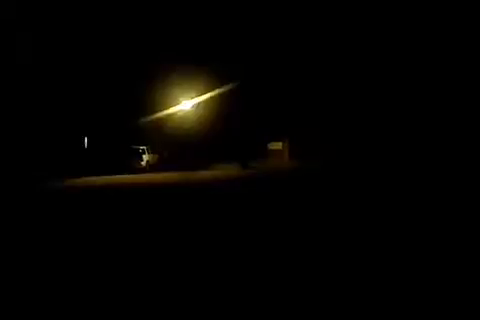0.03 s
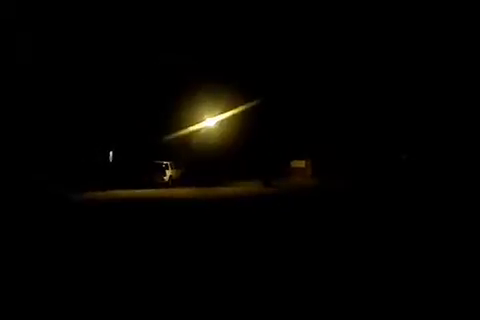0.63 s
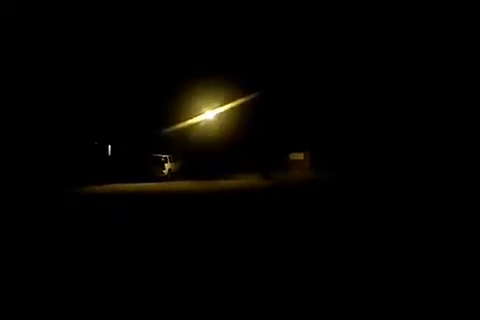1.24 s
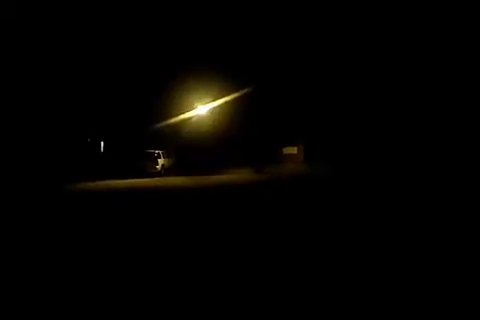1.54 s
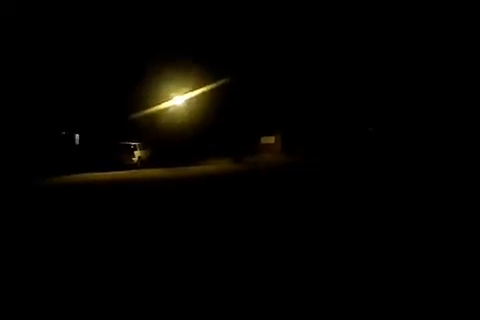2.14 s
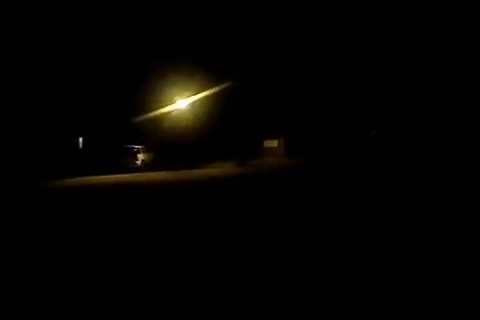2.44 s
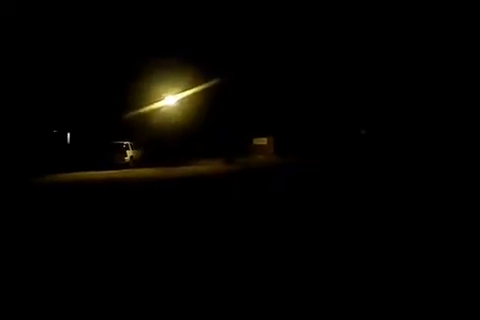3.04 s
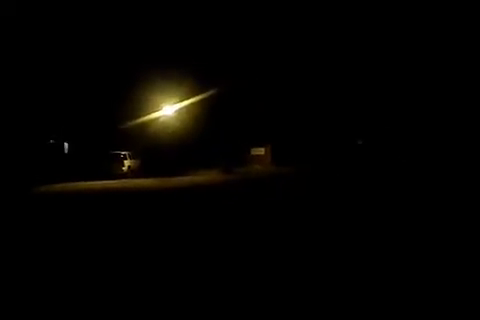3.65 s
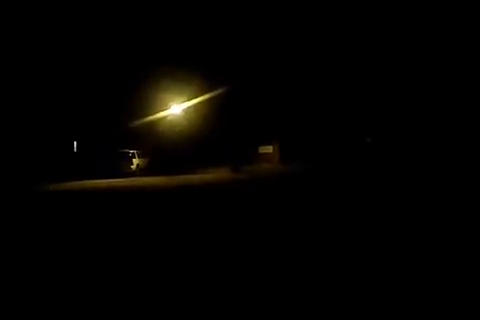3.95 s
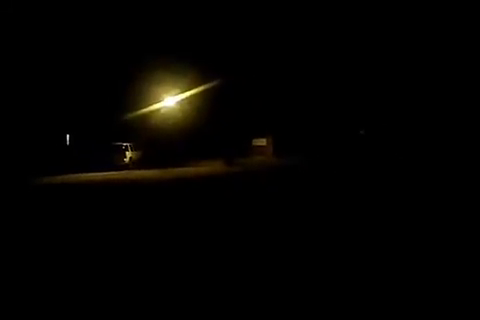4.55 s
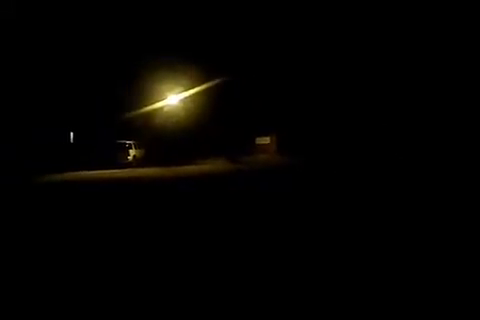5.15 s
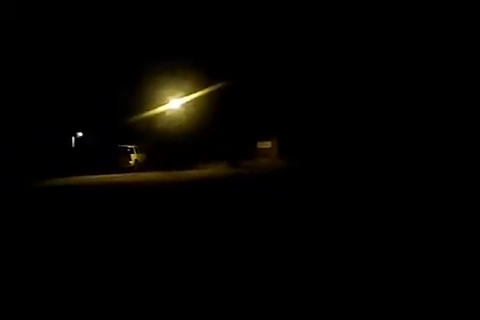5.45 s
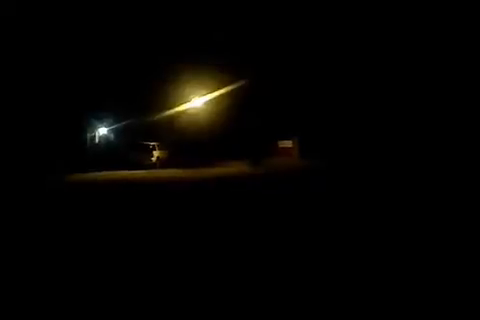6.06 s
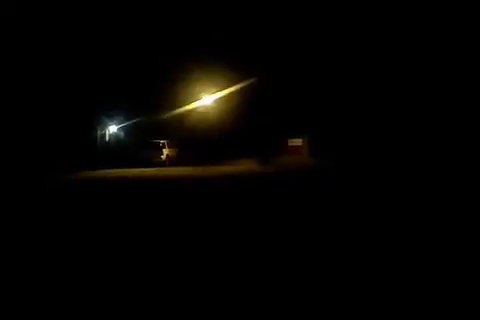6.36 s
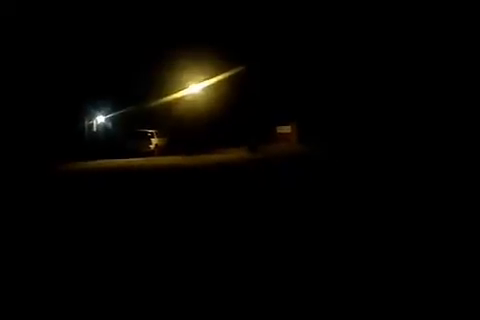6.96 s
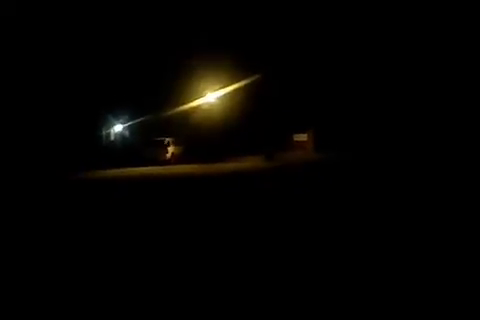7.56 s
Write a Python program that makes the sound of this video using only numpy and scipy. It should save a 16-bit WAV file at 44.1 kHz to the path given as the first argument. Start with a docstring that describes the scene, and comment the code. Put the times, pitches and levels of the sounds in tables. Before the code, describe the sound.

On a residential street at night, crickets trill steadily and two katydids rasp in short runs on the right. Firecrackers go off some streets away: three echoing bangs, a few faint far thuds, then four more bangs. Hollow mortar launch thumps follow, and three more bangs come near the end. Each blast slaps off the houses and rolls into a low town rumble, heard in stereo from a distance.

```python
"""A neighbourhood on a warm night, with firecrackers and mortar shells going off some streets away.
Each blast, a thump plus a shock front, bounces off the ground and nearby walls, then rolls round
the houses and swells the low town rumble; the mortar tubes ring briefly as their shells leave.
Two katydids rasp on the right, scraping one wing over the other, above a steady chorus of crickets."""
import sys
import numpy as np
from scipy import signal
from scipy.fft import rfft, irfft, next_fast_len
from scipy.io import wavfile

SR = 44100
rng = np.random.default_rng(int(sys.argv[2]) if len(sys.argv) > 2 else 0)


def bounce(signal):
    """Save signal as a 16-bit WAV file at the path given by the first command-line argument."""
    frames = np.transpose(np.atleast_2d(signal))
    limited = np.clip(frames, -1, 1)
    pcm = np.round(limited * 32767).astype(np.int16)
    wavfile.write(sys.argv[1], SR, pcm)


N = 344862
T = np.arange(N) / SR
SIZE = next_fast_len(N + 3 * SR)   # room for the reverb tails
FREQS = np.maximum(np.arange(SIZE // 2 + 1) * SR / SIZE, 1)


def from_db(db):
    return np.exp(np.asarray(db) * (np.log(10) / 20))


def unit_rms(x):
    return x / np.sqrt(np.mean(x ** 2) + 1e-20)


def pan(db):
    """Left and right gains; positive dB leans left."""
    return from_db(np.array([[.5], [-.5]]) * db)


def at_hz(points, hz, column=1):
    """Read a curve along a log-frequency axis."""
    points = np.array(points)
    return np.interp(np.log(hz), np.log(points[:, 0]), points[:, column])


def fader(rows):
    """Gain ride through (t/s, level/dB) points."""
    return from_db(np.interp(T, *np.transpose(rows)))


def colour(x, response):
    """Filter by a frequency response."""
    return irfft(rfft(x, SIZE) * response, SIZE)[..., :N]


def causal_eq(db):
    """The minimum-phase response with these levels: nothing sounds early."""
    cepstrum = irfft(np.log(from_db(db)), SIZE)
    cepstrum[1:SIZE // 2] *= 2
    cepstrum[SIZE // 2 + 1:] = 0
    return np.exp(rfft(cepstrum))


def resonance(hz, width_hz):
    """Two identical resonant band-passes in series."""
    return (1 / (1 + 1j * (FREQS ** 2 - hz ** 2) / (FREQS * width_hz))) ** 2


def drift(per_s):
    """Random modulator gliding between normally distributed values."""
    knots = rng.standard_normal(int(N / SR * per_s) + 2)
    return np.interp(T * per_s, np.arange(len(knots)), knots)


# stereo image of diffuse sound: f/Hz, left-right correlation
EAR_LIKENESS = [(100, 0.96), (220, 0.98), (400, 0.88), (700, 0.49), (2000, 0)]
def diffuse_noise():
    """White noise from all round: alike in both ears in the bass only."""
    alike = np.clip(at_hz(EAR_LIKENESS, FREQS), -1, 1)
    mid, side = rng.standard_normal((2, N))
    return colour(mid, np.sqrt((1 + alike) / 2)) + colour(side, np.sqrt((1 - alike) / 2)) * [[1], [-1]]


# EQ of the low town bed: f/Hz, level/dB
RUMBLE_EQ = [(15, -64.5), (25, -21.5), (59, -16), (91, -7), (173, -9), (207, -14.5), (323, -10), (360, -13),
             (487, -14.5), (673, -17.5), (945, -25.5), (1400, -55.5), (2340, -74), (3960, -120)]
def town_rumble(calm_db=-51.5, waver_db=0.7, swell=4.3, build_s=0.32, decay_s=0.49):
    """Low rumble of far streets; each blast swells it as its sound comes back from all over town."""
    t = T[::100]
    power = 1
    for s, db, *_ in volley():
        age = np.maximum(t - s, 0)
        power += (swell * from_db(db) * (1 - np.exp(-age / build_s))) ** 2 * np.exp(-age / decay_s)
    gain = np.interp(T, t, np.sqrt(power)) * from_db(calm_db + waver_db * drift(47))
    return gain * unit_rms(colour(diffuse_noise(), from_db(at_hz(RUMBLE_EQ, FREQS))))


# fader ride of the town's midrange: t/s, level/dB
HUSH_RIDE = [(0, -64), (.7, -62), (1.6, -60), (2.3, -64), (3.3, -63.5), (3.7, -65), (4.5, -53.5),
             (5.7, -61.5), (6.6, -67), (7.05, -74), (7.2, -79.5), (7.82, -48.5)]
def town_hush():
    """The midrange of the town's noise, a soft wash that ebbs and returns."""
    wash = colour(rng.standard_normal((2, N)), resonance(hz=930, width_hz=920))
    return pan(-3) * fader(HUSH_RIDE) * unit_rms(wash)


# EQ of the insect bed: f/Hz, level/dB
CHORUS_EQ = [(1000, -36.5), (1550, -29), (2000, -14), (2450, -11.5), (2900, -4.5), (3300, -8.5),
             (3800, -14), (4300, -8.5), (4800, -4), (5250, -2), (5550, -12.5), (5900, -9.5), (6650, -3.5),
             (6900, -30.5), (11000, -28), (13000, -11.5)]
# its pan by frequency: f/Hz, left minus right/dB
CHORUS_PAN = [(2000, -15.5), (3200, -8.5), (4500, -13.5), (5500, -19), (6500, -3.5)]
# its fader ride, before trim: t/s, level/dB
CHORUS_RIDE = [(0, -53), (1.9, -48), (2.6, -49.5), (3.3, -50.5), (3.7, -45.5), (4.12, -51), (4.45, -47),
               (4.75, -50), (5.5, -49), (6.6, -49), (7.82, -49.5)]
def far_chorus(trim_db=4.5, waver_db=1.0):
    """Many distant insects blur into one bright, gently wavering bed."""
    eq = pan(at_hz(CHORUS_PAN, FREQS)) * from_db(at_hz(CHORUS_EQ, FREQS))
    bed = unit_rms(colour(rng.standard_normal((2, N)), eq))
    return from_db(trim_db + waver_db * drift(9.1)) * fader(CHORUS_RIDE) * bed


def crickets(hz, width_hz, strokes_per_s, uneven, pulse_db):
    """Far crickets: a narrow wing tone, pulsed by the strokes."""
    phase = 2 * np.pi * np.cumsum(strokes_per_s * (1 + uneven * drift(50))) / SR
    tone = colour(rng.standard_normal((2, N)), resonance(hz, width_hz))
    return unit_rms(tone * from_db(pulse_db * np.sin(phase)))


def stroke_envelope(strokes, half_s):
    """Each wing stroke (t/s, level/dB) swells and dies within a few tens of milliseconds."""
    t = T[::50]
    return np.interp(T, t, sum(from_db(db) * np.exp(-np.abs((t - s) / half_s) ** 3) for s, db in strokes))


RIGHT_LAG_S = .0004   # a katydid's direct sound reaches the right channel this much later
def wing_rasp(strokes, wing, half_s, teeth_per_s, wet, foliage_t60, foliage_hz=5100):
    """A scraper drags over file teeth; the wing rings and foliage smears the clicks, most in the treble."""
    teeth_passed = np.floor(np.cumsum(teeth_per_s * from_db(3 * drift(500))) / SR)
    teeth = np.diff(teeth_passed, prepend=0) * from_db(2.7 * rng.standard_normal(N))
    clicks = stroke_envelope(strokes, half_s) * unit_rms(teeth)
    t = T[:SR // 2]
    foliage = unit_rms(rng.standard_normal((2, len(t))) * from_db(-60 * t / foliage_t60)) / np.sqrt(len(t))
    send = wet * np.minimum(FREQS / foliage_hz, 1) ** 2
    direct = np.exp(-2j * np.pi * FREQS * np.array([[0], [RIGHT_LAG_S]]))
    space = (direct + send * rfft(foliage, SIZE)) / np.sqrt(1 + send ** 2)
    body = np.sqrt(sum(np.abs(from_db(db) * resonance(hz, width)) ** 2 for hz, width, db in wing))
    return colour(clicks, unit_rms(body) * space)


def wing_note(strokes, hz, waver_hz, half_s, rough_db=4.0, wander_hz=20):
    """One wing mode sings on each stroke; uneven teeth shake its pitch and level."""
    pitch = hz + wander_hz * drift(14) + waver_hz * drift(180)
    envelope = stroke_envelope(strokes, half_s) * from_db(rough_db * drift(300))
    note = envelope * np.sin(2 * np.pi * np.cumsum(pitch) / SR)
    return np.array([note, np.interp(T - RIGHT_LAG_S, T, note)])


# cues of the farther katydid: t/s, number of rasps, relative level/dB
FAR_PHRASES = [(0.293, 5, -47.5), (2.177, 5, -50), (2.951, 3, -51), (5.219, 1, -48.5), (6.288, 2, -48),
               (7.736, 2, -47)]
# its wing resonances: f/Hz, width/Hz, level/dB
FAR_WING_MODES = [(2380, 1200, -10), (3120, 240, 4.5), (3800, 1800, -5), (4810, 650, 4), (5480, 450, 3)]
def far_katydid(step_s=0.077):
    """Short runs of fairly dry wing rasps, well to the right."""
    strokes = [(s + k * step_s, db) for s, count, db in FAR_PHRASES for k in range(round(count))]
    rasp = wing_rasp(strokes, FAR_WING_MODES, half_s=0.033, teeth_per_s=1600, wet=0.84, foliage_t60=0.042)
    return pan(-18.5) * rasp


# cues of the near katydid: t/s, number of rasps, relative rasp level/dB, relative note level/dB
NEAR_PHRASES = [(.208, 3, -42, -48.5), (1.445, 4, -40, -51.5), (2.588, 4, -40.5, -45),
                (3.645, 4, -40.5, -44), (4.877, 4, -38.5, -47), (5.942, 4, -40, -46), (7.143, 4, -41, -46)]
# its rasp's EQ peaks: f/Hz, width/Hz, level/dB; the top row is a faint high sizzle on each rasp, reaching past
# the treble cut
NEAR_RASP_PEAKS = [(2400, 1100, -10), (2750, 680, -13), (3530, 950, -1.5), (4200, 220, -5.5),
                   (4960, 270, -8.5), (5300, 170, -1.5), (5264, 1120, 4), (5960, 530, -24),
                   (12200, 2700, 3.5)]
# its singing modes: f/Hz, waver/Hz, half-length/s, delay/s, level/dB, left minus right/dB
SINGING_MODES = [(2400, 60, .021, -0.0057, -3, -1.5), (5224, 65, 0.043, 0.014, -0.5, -15.5),
                 (6195, 30, .035, 0.0084, -12, -9.5)]
def near_katydid(step_s=0.0855, opening_s=0.074, opening_db=-14):
    """Rasps layered with ringing wing notes; a faint stroke leads each phrase as the wings open."""
    strokes = [(s + k * step_s, db) for s, count, db, _ in NEAR_PHRASES for k in range(round(count))]
    strokes += [(s - opening_s, db + opening_db) for s, _, db, _ in NEAR_PHRASES]
    sung = [(s + k * step_s, db) for s, count, _, db in NEAR_PHRASES for k in range(round(count))]
    rasp = wing_rasp(strokes, NEAR_RASP_PEAKS, half_s=.034, teeth_per_s=1300, wet=1.35, foliage_t60=0.54)
    out = from_db(5.5) * pan(-10.5) * rasp
    for hz, waver_hz, half_s, delay_s, note_db, pan_db in SINGING_MODES:
        notes = [(s + delay_s, db + note_db) for s, db in sung]
        out += pan(pan_db) * wing_note(notes, hz, waver_hz, half_s)
    return out


# reverb of the house fronts: f/Hz, scatter level/dB, scatter t60/s, roll level/dB, roll t60/s
STREET_BANDS = [(58, -9, 0.16, -18.5, 2), (137, -5, 0.44, -13.5, 8.6), (282, -9.5, 0.38, -13, 2.5),
                (470, -16, 0.23, -12, 11.5), (646, -1, 0.19, -5, 6), (950, -11, 0.49, -5.5, 2.5),
                (1810, -2.5, 0.23, -5, 2.8), (3870, 2, 0.26, 8, 0.5)]
# echo off one far wall, dulled by the trip: f/Hz, level/dB
FAR_WALL_EQ = [(130, -18), (500, -29.5), (1200, -14.5), (2500, -30.5)]
def street_reverb(build_s=0.0068, rise_s=0.0024, predelay_s=.006, echo_s=.236, echo_t60=0.22):
    """Response of the houses: quick scatter, one far echo and a long lumpy roll, dying by band."""
    t = T[:3 * SR]
    noises = [diffuse_noise()[:, :len(t)] for _ in range(2)]
    edges_hz = 35 * 2 ** np.arange(0, 8, .5)
    # single roofs and walls stand out
    lumps = from_db(4.5 * np.tanh(drift(40)) + 3.0 * np.tanh(drift(300)))[:len(t)]
    attack = np.clip((t - predelay_s) / rise_s, 0, 1)
    echo = unit_rms(from_db(-60 * np.abs(t - echo_s) / echo_t60) * (t > echo_s))
    out = 0
    for k, (low, high) in enumerate(zip(edges_hz, edges_hz[1:])):
        hz = np.sqrt(low * high)
        scatter_db, scatter_t60, roll_db, roll_t60 = (at_hz(STREET_BANDS, hz, c) for c in (1, 2, 3, 4))
        scatter = from_db(scatter_db) * unit_rms(from_db(-60 * t / scatter_t60) * attack * np.sqrt(lumps))
        roll = from_db(roll_db) * unit_rms(from_db(-60 * t / roll_t60) * (1 - np.exp(-t / build_s)) * lumps)
        power = scatter ** 2 + roll ** 2 + (from_db(at_hz(FAR_WALL_EQ, low)) * echo) ** 2
        band = signal.sosfilt(signal.butter(2, [low, high], "band", fs=SR, output="sos"), noises[k % 2])
        out += np.sqrt(power / len(t)) * band
    return rfft(out, SIZE)


# direct sound and bounces off ground and nearby walls: delay/ms, right ear lag/ms, level/dB
NEAR_TAPS = [(0, .37, 0), (1.71, .68, -11.3), (5.29, .37, -9), (6.42, -.12, -12.3), (7.51, -.31, -3),
             (8.92, -.5, -10.5), (9.47, -.22, -6.1), (13.05, -.27, -7.9), (13.96, -.12, -8.4),
             (16.06, -.3, -20), (20.95, -.14, -13.2), (22.38, -.26, -16.5), (35.1, -.13, -19)]
# slapbacks with the crack but less thump: delay/ms, right ear lag/ms, level/dB, low cut/Hz
SLAP_TAPS = [(27.54, -.2, -21, 200), (30.74, 0.27, -16.5, 1100), (44.6, 0.2, -14, 300),
             (58.1, -0.12, -17.5, 310), (69.9, -.1, -11, 790), (236, -0.14, -20.5, 450),
             (297, -0.24, -17, 1100)]
def early_paths():
    """Response of the direct path and the distinct reflections, each a stereo delay tap."""
    def tap(ms, lag_ms, db):
        return from_db(db) * np.exp(-2j * np.pi * FREQS * np.array([[ms], [ms + lag_ms]]) / 1000)
    slaps = sum(tap(ms, lag_ms, db) / (1 + hz / (1j * FREQS)) for ms, lag_ms, db, hz in SLAP_TAPS)
    return sum(tap(*row) for row in NEAR_TAPS) + slaps


# mortar launch cues: t/s, relative level/dB
LAUNCH_CUES = [(5.1492, -10), (5.186, -15.5), (6.0198, -12.5)]
# air column of a mortar tube: f/Hz, t60/s, level/dB
TUBE_RING = [(147, 0.2, -29), (282.6, 0.11, -11)]
def mortar_tubes():
    """The air in a mortar tube rings briefly as the shell leaves it."""
    out, age = np.zeros(N), T[:SR // 2]
    ring = sum(from_db(db - 60 * age / t60) * np.sin(2 * np.pi * hz * age) for hz, t60, db in TUBE_RING)
    for s, db in LAUNCH_CUES:
        start = round(s * SR)
        out[start:start + len(age)] -= from_db(db) * ring   # same polarity as the thump
    return out


CRACKER_HZ = 429   # pitch of a typical firecracker's pressure swing
def pressure_swing(hz, swing_q=1.92, rebound_ratio=0.24, rebound_q=1.23, lowest_hz=107):
    """One swing and its rebound, peak 1; bigger charges swing slower and their rebound lasts longer."""
    swing_w = 2 * np.pi * hz / SR
    rebound_w = 2 * np.pi * max(rebound_ratio * hz, lowest_hz) / SR
    ring_q = rebound_q * np.clip((CRACKER_HZ / hz) ** 2, 1, 3.2)
    pulse = np.r_[-1., np.zeros(SR // 10)]
    pulse = signal.lfilter(*signal.bilinear([1], [1, swing_w / swing_q, swing_w ** 2]), pulse)
    pulse = signal.lfilter(*signal.bilinear([1, 0, 0], [1, rebound_w / ring_q, rebound_w ** 2]), pulse)
    return pulse / np.abs(pulse).max()


def shock_front(hz, samples, ragged=0.19, ragged_s=0.0017, ragged_hz=1300):
    """A spike torn by the air and dulled by distance, plus a clean spike for the reverb send."""
    spike = -signal.unit_impulse(samples)
    tear = ragged * rng.standard_normal(samples) * np.exp(-T[:samples] / ragged_s)
    tear = signal.sosfilt(signal.butter(2, ragged_hz, "high", fs=SR, output="sos"), tear)
    dull_hz = min(3300 * (hz / CRACKER_HZ) ** 2.3, SR / 4)   # slower blasts are duller
    air = signal.butter(2, dull_hz, fs=SR, output="sos")
    return signal.sosfilt(air, [0.94 * spike + tear, spike * np.linalg.norm(tear)])


# thuds of shells much farther off: t/s, relative level/dB, f/Hz
THUD_CUES = [(2.428, -38, 165), (2.687, -29, 273), (2.829, -31.5, 282), (2.941, -36, 283.7),
             (3.023, -33, 128.3), (3.196, -31, 248), (3.285, -35.5, 235.6), (5.376, -30.5, 223),
             (5.475, -29.5, 296.8), (6.467, -28.5, 263), (6.745, -38, 307)]
# firecracker cues: t/s, relative level/dB, f/Hz, crack trim/dB, reverb send/dB
CRACKER_CUES = [(.211, -25, 463, -4.5, 12.5), (0.5176, -7.5, 448, -3, 5.5), (0.815, -6.5, 430, -1, 4.5),
                (1.0285, -6.5, 449.3, 4, 4), (1.269, -26, 534, 4, 1), (1.7, -24.5, 660, 7, 4),
                (2.444, -34.5, 450, 16, 4.5), (3.7219, -7.5, 410, 1.5, 5.5), (4.1619, -5.5, 430, -2, 5),
                (4.2188, -6.5, 424.7, 6.5, 3.5), (4.4601, -7, 423, 5.5, 3), (7.1938, -6, 415, 2.5, 5),
                (7.2712, -6, 440, -1, 5), (7.6802, -5.5, 425, 4.5, 1.5)]
def volley():
    """Every blast in time order: t/s, relative level/dB, f/Hz, crack trim/dB, reverb send/dB."""
    thuds = [(s, db, hz, -10.5, 6.5) for s, db, hz in THUD_CUES]
    launches = [(s, db, 275, -17.5, 5) for s, db in LAUNCH_CUES]
    return sorted(thuds + launches + [tuple(row) for row in CRACKER_CUES])


# EQ of the shock front, with its slow after-pressure: f/Hz, level/dB
CRACK_EQ = [(25, 2), (100, -33), (500, -1.5), (800, 6.5), (1050, 8.5), (1400, -5.5), (2000, -0.5),
            (2700, -9.5), (4000, -23), (6500, -36.5)]
# pan of the blasts by frequency: f/Hz, left minus right/dB
BLAST_PAN = [(150, -0.5), (300, 0), (450, -4.5), (700, 8), (1080, -7.5), (1500, -4.5), (3000, -8)]
def fireworks(thump_db=-3.0, crack_db=3, sites=3):
    """Each blast, thump plus shock front, arrives by every near path and rolls in from its launch site."""
    direct, sends = np.zeros((2, N + SR)), np.zeros((sites, 2, N + SR))   # rows: thump, crack
    for k, (s, db, hz, trim_db, send_db) in enumerate(volley()):
        thump = from_db(db + thump_db) * pressure_swing(hz)
        crack, clean_crack = from_db(db + crack_db + trim_db) * shock_front(hz, len(thump))
        span = slice(round(s * SR), round(s * SR) + len(thump))
        direct[:, span] += [thump, crack]
        sends[k % sites, :, span] += from_db(send_db) * np.array([thump, clean_crack])
    layer_eq = np.array([np.ones(len(FREQS)), causal_eq(at_hz(CRACK_EQ, FREQS))])
    early = (rfft(direct, SIZE) * layer_eq).sum(0) * early_paths()
    roll = sum((rfft(send, SIZE) * layer_eq).sum(0) * street_reverb() for send in sends)
    left = causal_eq(at_hz(BLAST_PAN, FREQS) / 2)
    return irfft((early + roll) * np.array([left, 1 / left]), SIZE)[:, :N]


def scene():
    """Blasts and their echoes over the insects and the town."""
    blasts = fireworks() + mortar_tubes()
    katydids = near_katydid() + far_katydid()
    high_trill = crickets(hz=6459, width_hz=255, strokes_per_s=100, uneven=0.31, pulse_db=1.0)
    low_trill = crickets(hz=2813, width_hz=160, strokes_per_s=70, uneven=0.0089, pulse_db=3.0)
    trills = from_db(-48.0) * pan(-5.5) * high_trill + from_db(-57.5) * pan(-4.5) * low_trill
    return blasts + katydids + trills + far_chorus() + town_rumble() + town_hush()


def record(dry, fade_s=0.1, cutoff_hz=7060, top_hz=15500, hiss_db=-95, tick_s=5.7377, tick_db=-34):
    """The mix fades in and its treble is cut steeply; a trace of hiss and one faint tick reach higher."""
    faded = dry * np.clip(T / fade_s, 0, 1)
    dulled = signal.sosfilt(signal.ellip(11, .2, 41, cutoff_hz, fs=SR, output="sos"), faded)
    tick = from_db(tick_db) * signal.unit_impulse(N, round(tick_s * SR))
    hiss = from_db(hiss_db) * rng.standard_normal((2, N))
    return signal.sosfilt(signal.ellip(8, .2, 60, top_hz, fs=SR, output="sos"), dulled + tick + hiss)


dry = scene()
out = record(dry)
bounce(out)
```